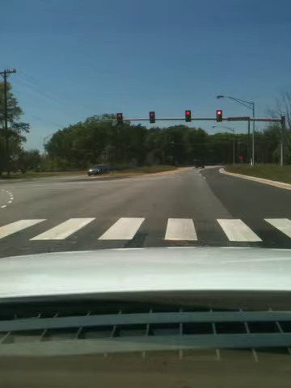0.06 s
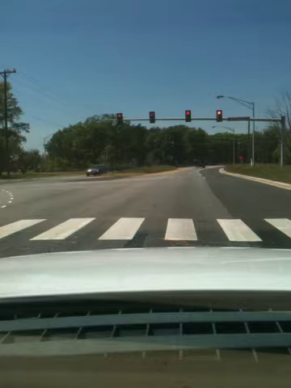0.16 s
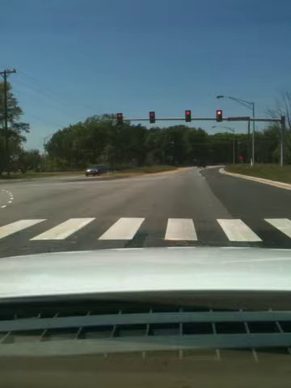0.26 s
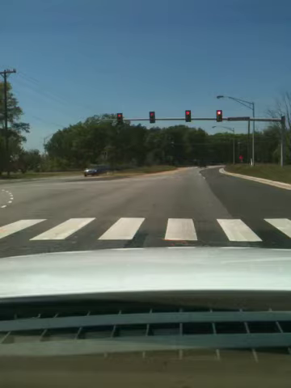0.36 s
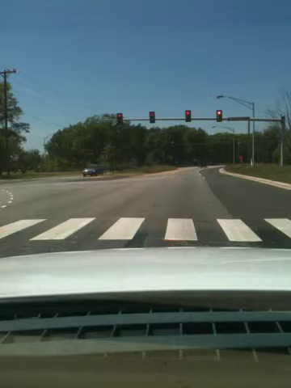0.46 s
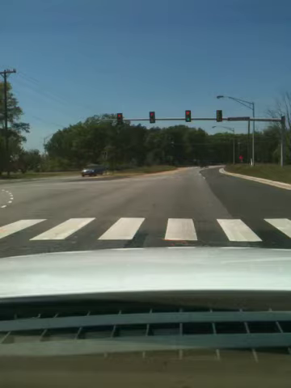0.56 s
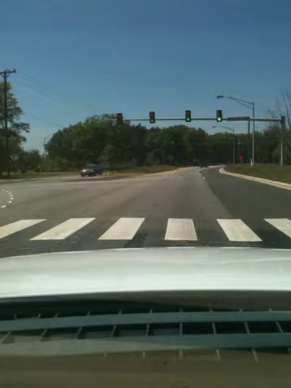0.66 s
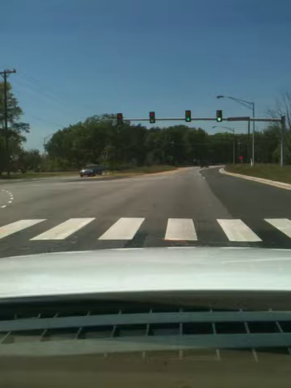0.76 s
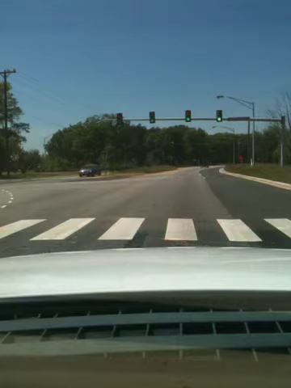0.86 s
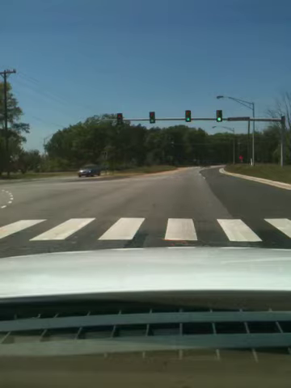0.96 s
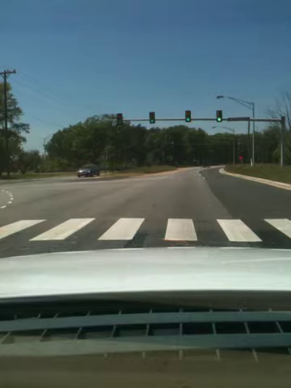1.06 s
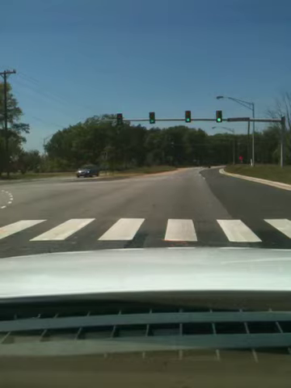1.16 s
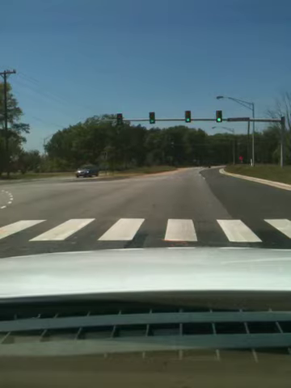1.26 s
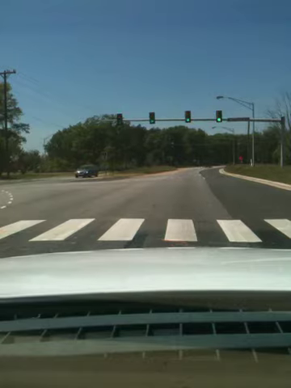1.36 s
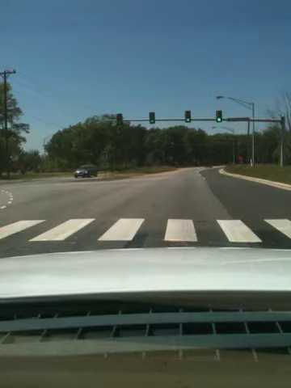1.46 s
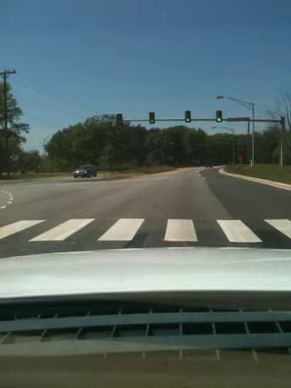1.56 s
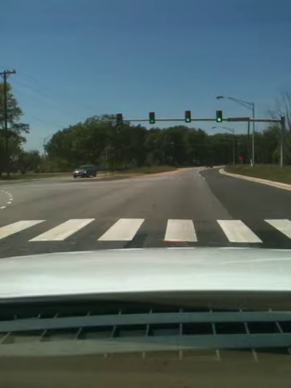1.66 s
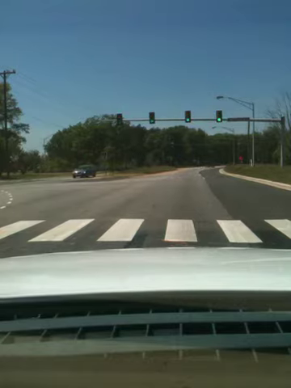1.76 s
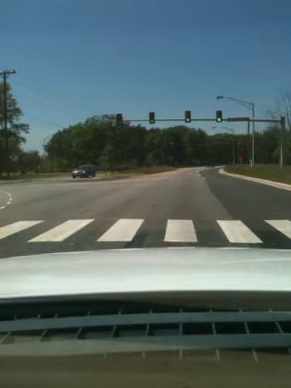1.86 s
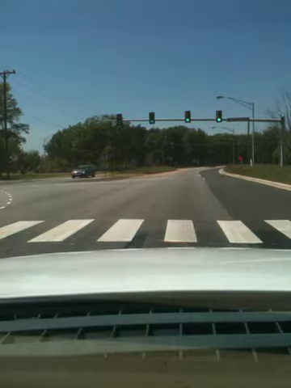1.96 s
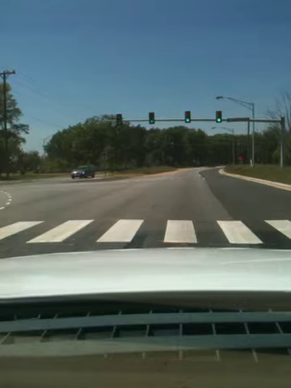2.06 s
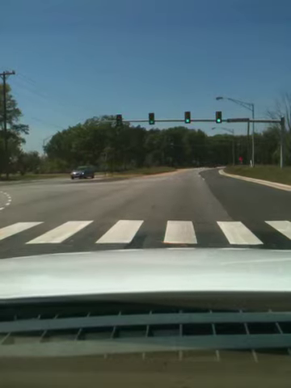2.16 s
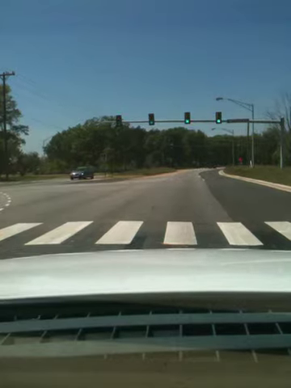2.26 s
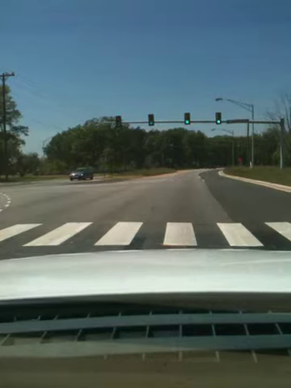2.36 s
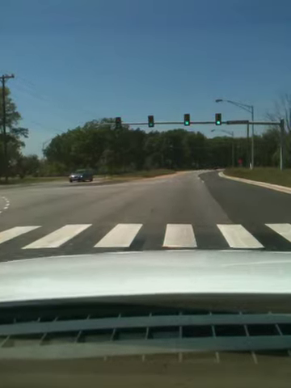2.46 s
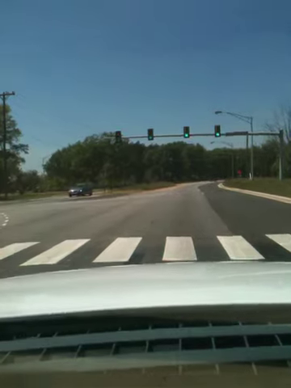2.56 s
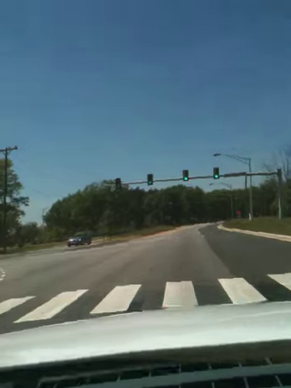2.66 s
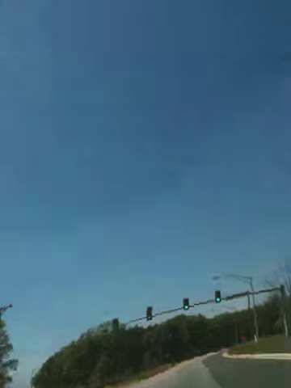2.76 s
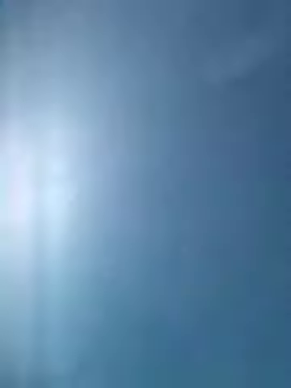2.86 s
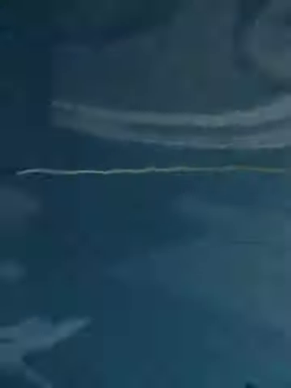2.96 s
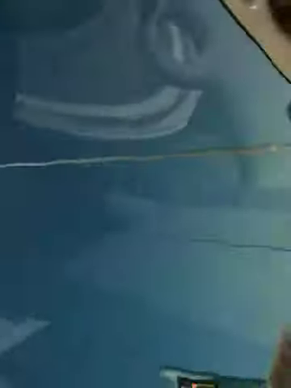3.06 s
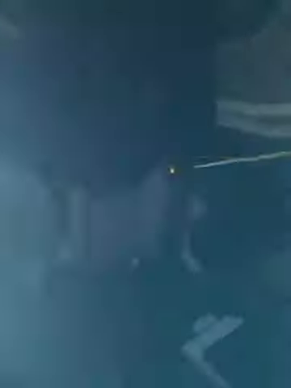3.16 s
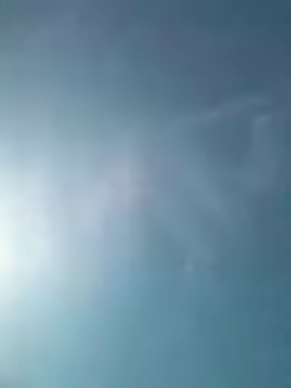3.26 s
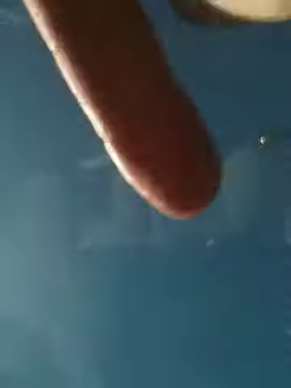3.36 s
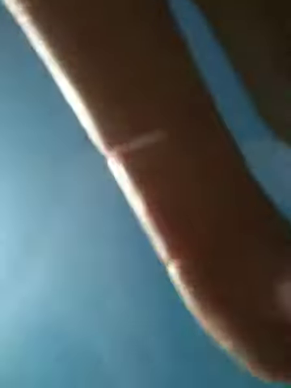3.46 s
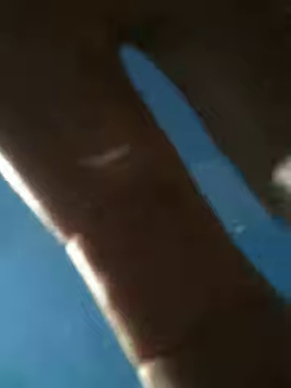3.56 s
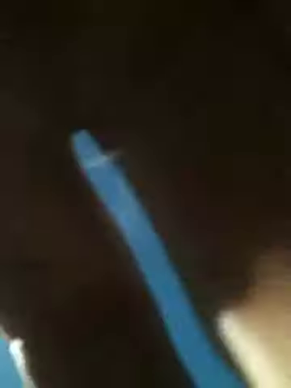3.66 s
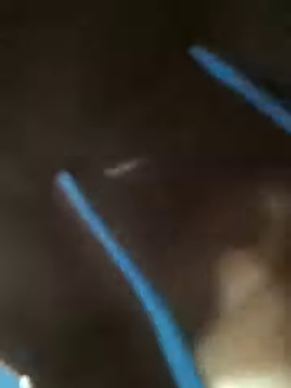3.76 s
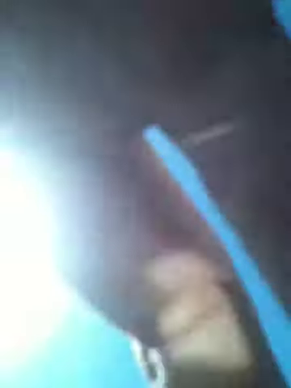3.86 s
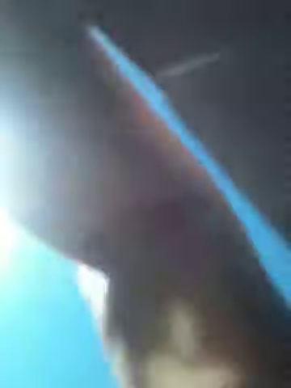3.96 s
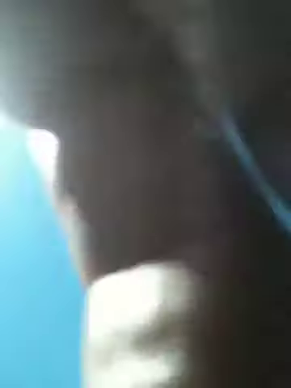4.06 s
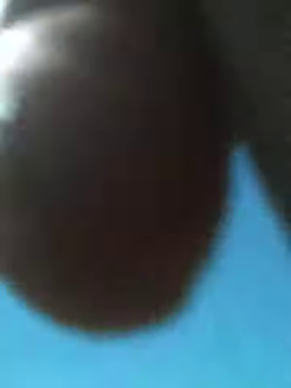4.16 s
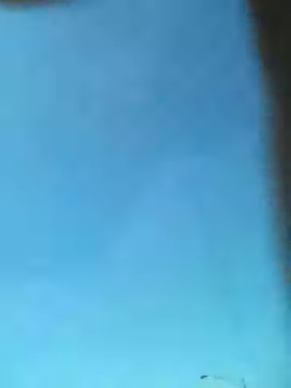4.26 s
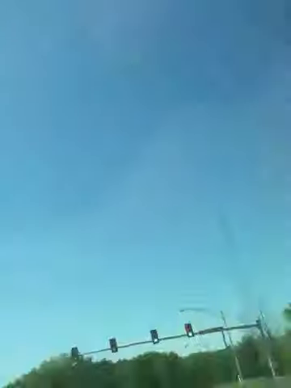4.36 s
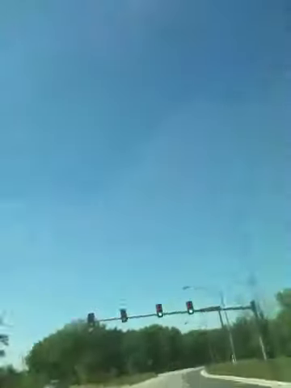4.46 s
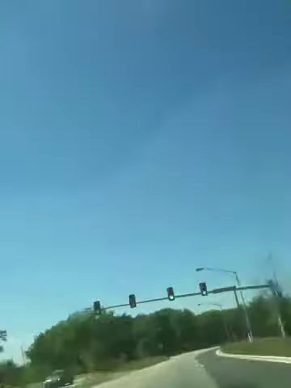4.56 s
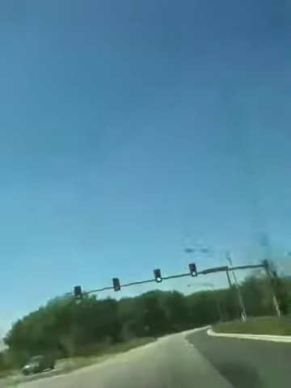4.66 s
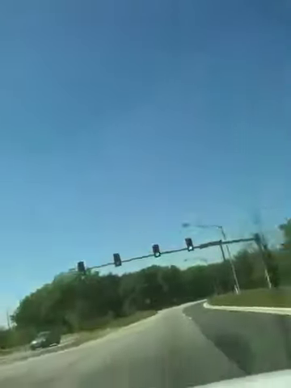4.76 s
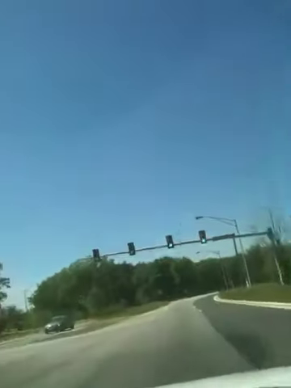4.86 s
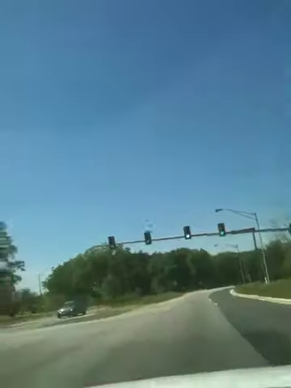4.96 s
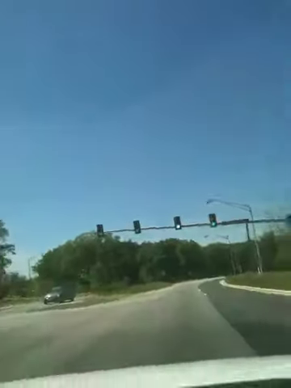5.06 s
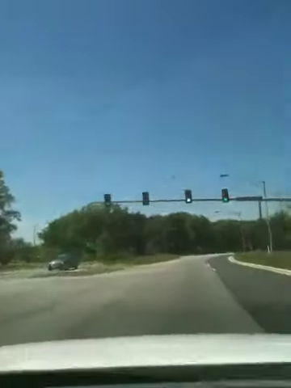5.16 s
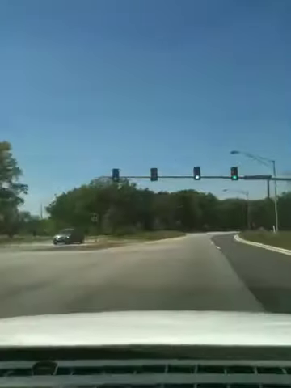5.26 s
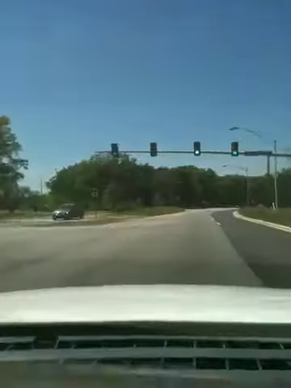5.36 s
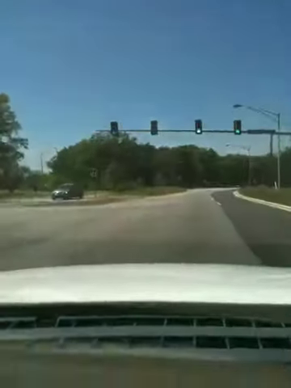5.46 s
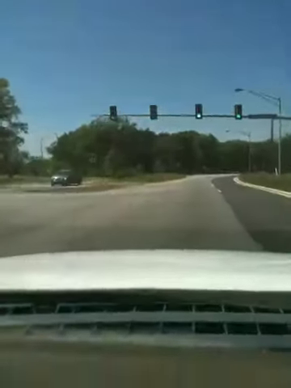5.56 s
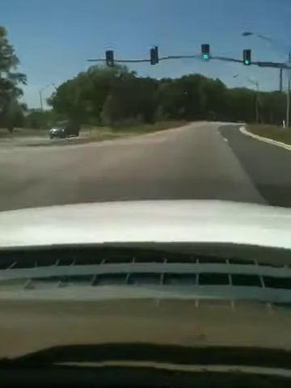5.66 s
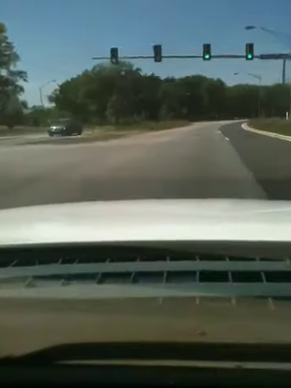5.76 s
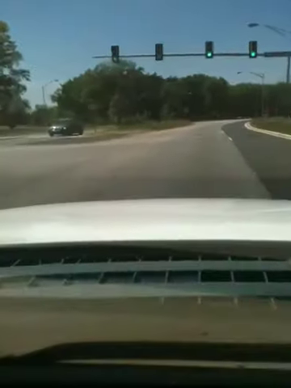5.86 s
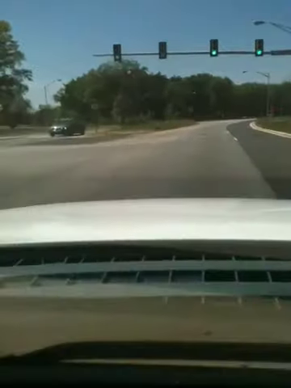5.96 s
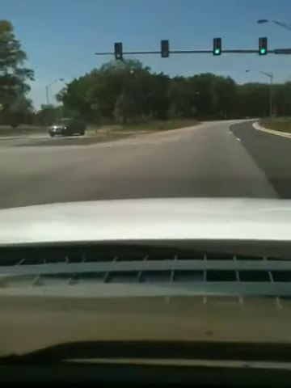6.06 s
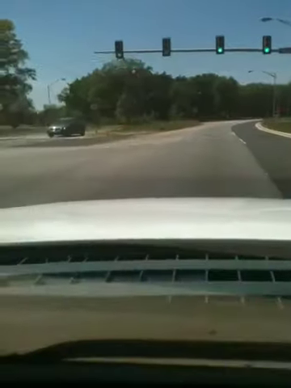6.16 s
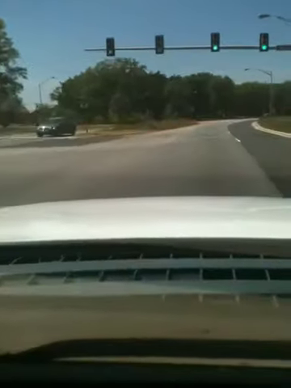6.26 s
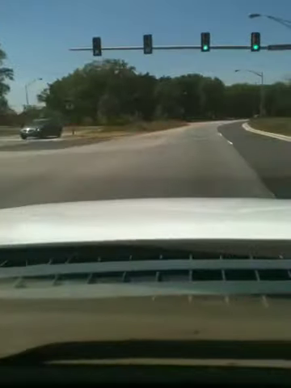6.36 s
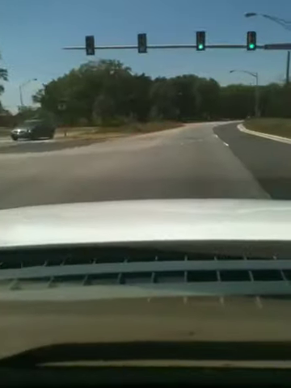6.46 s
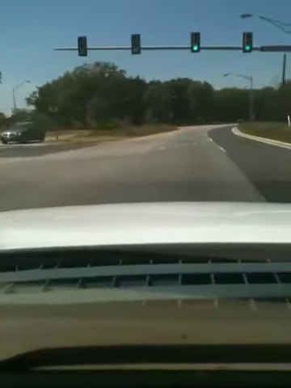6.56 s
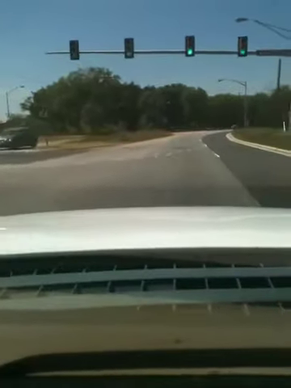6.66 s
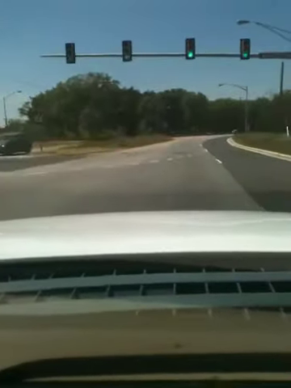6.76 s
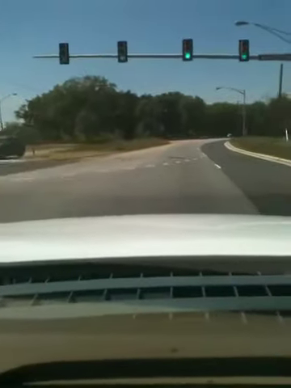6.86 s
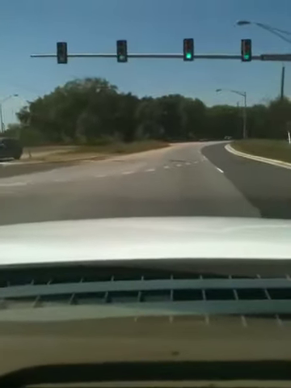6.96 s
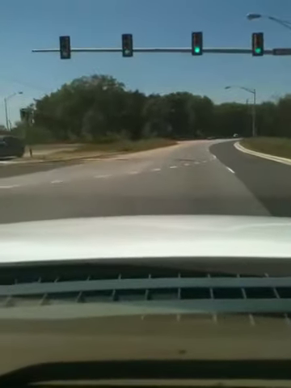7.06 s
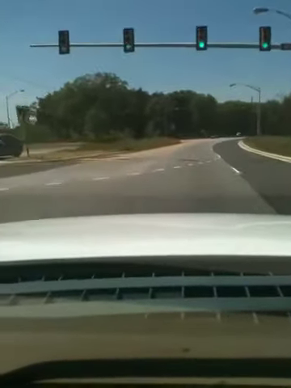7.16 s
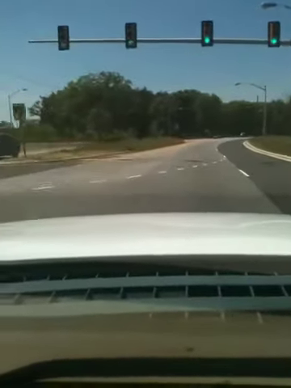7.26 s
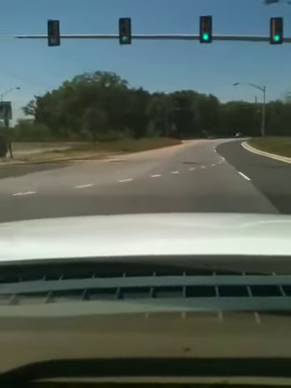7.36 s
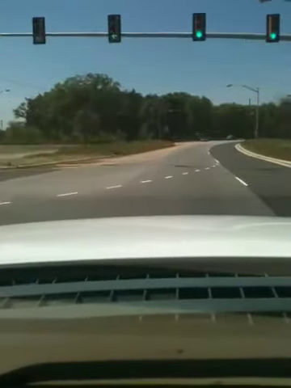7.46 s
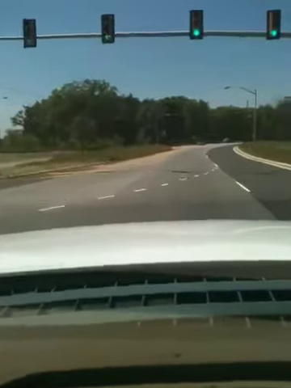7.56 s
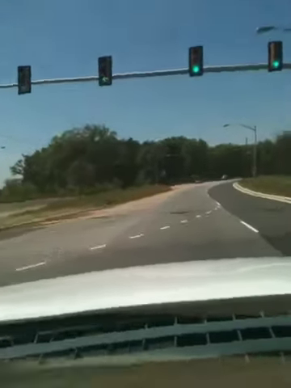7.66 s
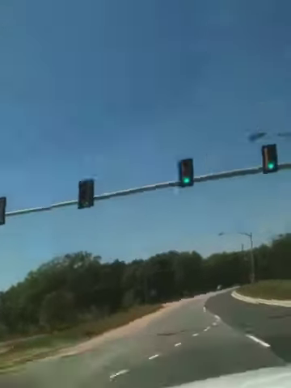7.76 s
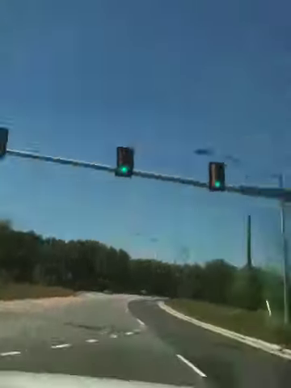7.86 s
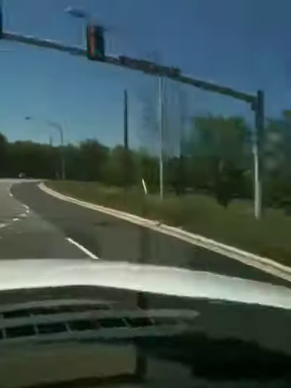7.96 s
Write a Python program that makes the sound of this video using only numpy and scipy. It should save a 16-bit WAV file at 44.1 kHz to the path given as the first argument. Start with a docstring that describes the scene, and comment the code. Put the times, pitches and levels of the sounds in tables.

```python
"""Eight-cylinder car cabin with a tumbling camera

The engine idles, pulls away, revs up and changes gear: tones at multiples of its cycle rate boom as they cross
cabin resonances, over puffing intake noise. Rumble and tyre roar are coloured noise that grows with speed.
The brake pedal bumps and creaks. A camera slides off the dashboard and tumbles: noise bursts and ringing modes
make its knocks, short cycles its ticks, and grainy noise its scrapes, rubbing fingers and shivers in its seat."""
import sys
import numpy as np
from scipy import signal
from scipy.fft import rfft, irfft, next_fast_len
from scipy.io import wavfile
from scipy.ndimage import uniform_filter1d, map_coordinates

SR = 44100
rng = np.random.default_rng(int(sys.argv[2]) if len(sys.argv) > 2 else 0)


def materialize(psi):
    """Save the field psi as 16-bit PCM at rate SR to the path in sys.argv[1].

    A 1-D psi becomes a single channel; in a 2-D psi each row is a channel.
    """
    bounded = np.clip(np.atleast_2d(psi).T, -1, 1)
    quanta = np.round(bounded * 32767).astype(np.int16)
    wavfile.write(sys.argv[1], SR, quanta)


N = 353682


def amp(db):
    """Decibels to gain."""
    return 10 ** (np.asarray(db) / 20)


def unit(x):
    """Scale to rms 1."""
    return x / np.sqrt(np.mean(x ** 2) + 1e-20)


def along(points, hz):
    """Read (frequency, value) points on a log frequency axis."""
    f, v = np.transpose(points)
    return np.interp(np.log(hz + 1), np.log(f + 1), v)


def curves(rows):
    """One value per sample for each column after the time."""
    s, *cols = np.transpose(rows)
    return [np.interp(np.arange(N) / SR, s, c) for c in cols]


def wobble(rate):
    """A smooth random curve with rate knots a second."""
    grid = np.arange(0, N + SR / rate, SR / rate / 5)
    knots = rng.standard_normal(int(N * rate / SR) + 4)
    smooth = map_coordinates(knots, [grid * rate / SR], mode="nearest")
    return np.interp(np.arange(N), grid, smooth)


def filtered(x, response):
    """Shape the spectrum of x by a response of frequency."""
    m = next_fast_len(len(x) + 8192)
    return irfft(rfft(x, m) * response(np.fft.rfftfreq(m, 1 / SR)), m)[:len(x)]


def noise(spectrum, size=N):
    """Coloured noise of rms 1."""
    return unit(filtered(rng.standard_normal(size), lambda hz: amp(along(spectrum, hz))))


def add(track, s, sound):
    """Mix a sound into the track at time s."""
    part = track[max(round(s * SR), 0):][:len(sound)]
    part += sound[:len(part)]


def strokes(rows):
    """Smooth swells from rows of (middle [s], length [s], level at the middle [dB])."""
    out = np.zeros(N)
    for s, length, db in rows:
        add(out, s - length / 2, amp(db) * np.hanning(round(length * SR)))
    return out


def ring(modes, t, scatter_db, detune):
    """Damped modes of peak 1; each contact draws new strengths and slightly new pitches."""
    y = 0
    for hz, db, t60 in modes:
        decay = amp(db + scatter_db * rng.normal() - 60 * t / t60)
        y = y + decay * np.sin(2 * np.pi * hz * (1 + detune * rng.normal()) * t)
    return y / np.abs(y).max()


def spot_colour(spectrum):
    """Every struck spot adds peaks and dips of its own to a shared spectrum."""
    hz = np.geomspace(80, 16000, 48)
    spot_db = 2.5 * rng.standard_normal(len(hz))
    return np.column_stack([hz, along(spectrum, hz) + spot_db])


PULL_AWAY_S, RUN_UP_S = 1.9, 4.93  # the car rolls off; time from there to full speed


def speed():
    """Road speed as a share of full speed: steady acceleration from rest."""
    return np.clip((np.arange(N) / SR - PULL_AWAY_S) / RUN_UP_S, 0, 1)


# engine speed: (time [s], firing rate [Hz])
FIRING_RATE = [(0, 42.6), (1.7, 42.2), (2.3, 60.5), (2.55, 64.5), (2.9, 77), (3.15, 83), (3.5, 91.5),
               (3.8, 97.5), (4.05, 103.7), (4.65, 129.2), (5.25, 139), (5.7, 151), (5.85, 159), (6.45, 176),
               (7.2, 195.4), (7.35, 193.1), (7.65, 161.5), (8.02, 159.5)]
# throttle opening, eased for the gear change; also drives the road noise: (time [s], engine load [dB])
ENGINE_LOAD = [(0, -12.5), (1.9, -6.5), (2.5, -0.5), (4.3, -3), (5.8, -0.5), (7.3, 1.5), (7.55, -3),
               (8.02, -0.5)]
# hum at five times the firing rate, strongest soon after rolling off: (time [s], level before waver [dB])
HUM_LEVEL = [(0, -60.5), (1.8, -58.5), (2.35, -61), (2.48, -46), (2.58, -49), (2.7, -65), (3.2, -85)]
# colour of intake and valve noise: (frequency [Hz], relative level [dB per Hz])
INTAKE_COLOUR = [(600, -1.5), (1050, 1), (1250, 2), (1500, -1), (1800, -26), (2050, -2), (2300, -48),
                 (2800, -17.5), (3350, -8), (4200, -27.5), (9000, -44)]
ENGINE_DB, INTAKE_DB = -44.5, -44.5  # at 0 dB load and top revs
ENGINE_DB_PER_OCTAVE = 11  # growth of the tones with the revs


def engine():
    """Eight firings a cycle drive exhaust tones and intake puffs; both grow with throttle and revs."""
    firing_hz, = curves(FIRING_RATE)
    load_db, = curves(ENGINE_LOAD)
    hum_db, = curves(HUM_LEVEL)
    cylinders = 8
    cycle_hz = uniform_filter1d(firing_hz, size=4000) / cylinders
    phase = 2 * np.pi * np.cumsum(cycle_hz) / SR
    revs = firing_hz / firing_hz.max()
    tone_db = ENGINE_DB + load_db + ENGINE_DB_PER_OCTAVE * np.log2(revs)
    tones = exhaust_tones(phase, cycle_hz, tone_db)
    hum = amp(hum_db + 2 * wobble(6)) * np.sqrt(2) * np.sin(5 * cylinders * phase)
    # one puff a firing
    puffs = unit(noise(INTAKE_COLOUR) * amp(1.2 * np.sin(cylinders * phase))) * revs ** 3
    return tones + amp(load_db + INTAKE_DB) * puffs + hum


# multiples of the cycle rate that stand out or stay back:
# (multiple, relative level [dB], extra at standstill that fades out towards full speed [dB])
FAVOURED_MULTIPLES = [(5, 0, -16), (6, -11, 0), (7, -7, 0), (8, 9, 0), (10, -7, 0), (11, -8, 12),
                      (12, -7, 0), (16, 0, 6), (17, 1, 0), (18, 1, 0), (19, 0, 0), (22, 0, 7), (24, 5, 0),
                      (26, 1, 0), (27, 2, 0), (29, 3, 0), (32, 3, 0)]
PLAIN_MULTIPLE_DB = -2.5  # all other multiples
# the cabin's response to the engine: (frequency [Hz], gain [dB])
CABIN_RESPONSE = [(50, -34), (64, -16), (78, -7), (100, -7), (116, -1), (131, 9), (138, -1), (143, -5),
                  (149, -1), (157, -8), (163, 6), (168, 7), (177, 10), (192, 4), (197, 0), (212, 1),
                  (232, -2), (256, 5), (278, 2), (322, -1), (345, -8), (365, -3), (395, -10), (482, -2),
                  (505, -12), (610, -19), (670, -17), (700, -11), (730, -18), (900, -19), (1250, -15),
                  (1500, -26)]
# panels that sing when one multiple sweeps through them:
# (multiple, resonance [Hz], half width [Hz], rms level at the resonance [dB])
SINGING_PANELS = [(13, 259, 11, -41.5), (14, 257, 7, -45), (14, 281, 8, -46), (16, 272, 8, -46),
                  (16, 321, 6, -44), (18, 362, 6, -46), (16, 203, 8, -47), (16, 128, 5, -50),
                  (16, 186, 9, -46), (17, 136, 5, -48), (26, 206, 5, -51), (8, 79, 5, -58),
                  (8, 102, 4, -52), (20, 385, 14, -49), (19, 462, 6, -47), (17, 279, 9, -44),
                  (18, 304, 6, -49), (22, 170, 4, -49), (22, 529, 6, -50), (24, 313, 7, -46.5),
                  (24, 282, 9, -50), (24, 484, 7, -44), (28, 473, 5, -50), (29, 707, 9, -45),
                  (29, 686, 5, -49), (30, 688, 6, -48), (32, 655, 20, -52), (32, 772, 8, -52),
                  (37, 745, 14, -53), (38, 700, 10, -53), (38, 845, 10, -52), (21, 466, 6, -47)]
SHIFT_S, SHIFT_HALF_S, SHIFT_CUT_DB = 7.28, 0.18, -9  # gear change: middle, half length, dip of the firing tone


def exhaust_tones(phase, cycle_hz, level_db):
    """Unequal cylinders sound many multiples of the cycle rate; each swells as it crosses a cabin resonance."""
    step, firing = 8, 8  # all tones lie below 2 kHz, so a coarse time grid will do
    phase, cycle_hz, level_db = phase[::step], cycle_hz[::step], level_db[::step]
    pulling = 1 - speed()[::step]
    favoured = {round(k): db + extra_db * pulling for k, db, extra_db in FAVOURED_MULTIPLES}
    from_shift = (np.arange(0, N, step) / SR - SHIFT_S) / SHIFT_HALF_S
    shift_db = SHIFT_CUT_DB * np.exp(-np.abs(from_shift) ** 6)
    out = 0
    for k in range(5, 64):
        if k == firing:
            waver_db = shift_db + 1.1 * wobble(16)[::step]
        else:
            waver_db = 2.6 * wobble(5)[::step]
        tone_hz = k * cycle_hz
        db = level_db + favoured.get(k, PLAIN_MULTIPLE_DB) + along(CABIN_RESPONSE, tone_hz) + waver_db
        power = amp(db) ** 2
        for multiple, hz, width, peak_db in SINGING_PANELS:
            if multiple == k:
                power = power + amp(peak_db) ** 2 / (1 + ((tone_hz - hz) / width) ** 2) ** 2
        # high multiples drift more in phase
        drift = 2 * np.pi * rng.random() + k / 110 * wobble(9)[::step]
        out = out + np.sqrt(power) * np.sin(k * phase + drift)
    return np.sqrt(2) * signal.resample_poly(out, step, 1)[:N]


# colours of body rumble, tyre roar and air hiss: (frequency [Hz], relative level [dB per Hz])
RUMBLE_COLOUR = [(20, -10), (45, -8), (75, -11), (105, -13), (130, 6.5), (165, -2), (210, 7.5), (280, -0.5),
                 (350, 3), (480, -13), (650, -14.5), (1000, -18), (2500, -41)]
TYRE_COLOUR = [(260, -19), (450, 0.5), (473, 3), (508, -0.5), (585, -5), (694, -3), (760, -7.5),
               (1070, -16.5), (1230, -21), (1860, -20.5), (2040, -21), (2210, -20.5), (3340, -25.5),
               (5000, -33.5), (6500, -34), (11000, -120)]
AIR_COLOUR = [(1470, 20), (2500, -3), (3060, 12), (3330, -8), (4140, -11), (6110, -21), (13400, -12),
              (15200, -51.5), (16000, -22)]
RUMBLE_IDLE_DB, ROAR_IDLE_DB = -48.5, -58  # standing
RUMBLE_MOVING_DB, ROAR_MOVING_DB = -42, -43  # added at full speed and 0 dB load
RUMBLE_POWER, ROAR_POWER = 0.62, 0.72  # growth with speed
ROAD_LOAD_SHARE = 0.29  # dB per dB of engine load


def road():
    """Body rumble and tyre roar rise out of the idling cabin's noise with speed and load; air hisses faintly."""
    load_db, = curves(ENGINE_LOAD)
    drive = amp(ROAD_LOAD_SHARE * load_db)
    shake = np.hypot(amp(RUMBLE_IDLE_DB), amp(RUMBLE_MOVING_DB) * drive * speed() ** RUMBLE_POWER)
    roar = np.hypot(amp(ROAR_IDLE_DB), amp(ROAR_MOVING_DB) * drive * speed() ** ROAR_POWER)
    rumble = shake * amp(1.2 * wobble(11)) * noise(RUMBLE_COLOUR)
    tyres = roar * amp(0.34 * wobble(8.5)) * noise(TYRE_COLOUR)
    return rumble + tyres + amp(-70.0) * noise(AIR_COLOUR)


# fingers and dashboard rub the sliding case: (middle [s], length [s], level at the middle [dB])
RUB_STROKES = [(2.913, 0.45, -54.5), (3.163, 0.17, -56), (3.74, 0.04, -54), (3.792, 0.25, -47),
               (3.965, 0.078, -44), (4.126, 0.11, -49), (4.496, 0.38, -54), (6.896, 0.98, -48),
               (7.39, 0.12, -51), (7.8, 0.75, -54)]
# colour of skin on plastic: (frequency [Hz], relative level [dB per Hz])
SKIN_COLOUR = [(800, 5.5), (1300, 4.5), (2500, -2.5), (3500, -1.5), (5000, -0.5), (7800, 1), (10500, -3.5),
               (13000, -8), (16000, -18)]
CREEP_STILL_DB, CREEP_MOVING_DB = -74.5, -55.5  # case creeping in its seat: standing, added at full speed
GRAIN_DB, FLUTTER_DB, CRACKLE_DB = 2, 1.5, -20  # fast grain, slower unevenness, stray catches against the rub


def rubbing():
    """Skin and plastic catch and slip in tiny grains, swelling with each stroke; stray crackles once moving."""
    pressure = strokes(RUB_STROKES)
    creep = amp(CREEP_STILL_DB) + amp(CREEP_MOVING_DB) * speed() ** 2.0
    grain = amp(GRAIN_DB * wobble(400) + FLUTTER_DB * wobble(45))
    catches = (rng.random(N) < 25 / SR) * rng.uniform(-1, 1, N)  # about 25 a second
    crackle = unit(filtered(catches, lambda hz: amp(along(SKIN_COLOUR, hz))))
    rub = unit(noise(SKIN_COLOUR) * grain)
    return np.hypot(pressure, creep) * (rub + amp(CRACKLE_DB) * crackle * (speed() > 0))


# bumps and creaks as the brake lets go:
# (time [s], relative bump level [dB], creak peak [dB], creak pitch at the start [Hz])
PEDAL_MOVES = [(0.92, -37, -47, 665), (0.962, -30, -45, 1035), (1.012, -43, -52, 1070),
               (1.047, -35, -37, 920), (1.054, -37, -43, 835), (1.067, -35.5, -50, 790),
               (1.11, -44, -51, 1020)]
# modes of the pedal linkage: (frequency [Hz], relative level [dB], t60 [s])
LINKAGE_MODES = [(180, 5, 0.16), (377, 8, 0.046), (485, -4, 0.18), (850, 4, 0.019), (986, -13, 0.12)]
CREAK_S, CREAK_SAG = 0.0035, 0.027  # time to swell; share by which the pitch ends up lower


def pedal():
    """The released brake bumps softly under the dashboard, creaks and sighs."""
    out, t = np.zeros(N), np.arange(SR // 3) / SR
    sigh_colour = [(1500, 6.0), (3500, -3), (4150, 5), (4700, -2), (10000, -4.0), (15000, -21)]
    for s, bump_db, creak_db, hz in PEDAL_MOVES:
        age = t / CREAK_S
        sag = 1 - CREAK_SAG * np.tanh(age / 2)
        creak = np.sin(2 * np.pi * hz * t * sag) * age ** 2 * np.exp(2 - 2 * age)
        bump = ring(LINKAGE_MODES, t, scatter_db=2, detune=.02) * (1 - np.exp(-t / .002))
        sigh = amp(-62.5 - 60 * t / 0.35) * noise(sigh_colour, size=len(t))
        add(out, s, amp(bump_db + 7.5) * bump + amp(creak_db) * creak + sigh)
    return out


# case and fingers scrape over plastic: (time [s], length [s], slip level [dB], ring level [dB],
# ring pitch at the start [Hz], ring pitch at the end [Hz], ring width [Hz])
PLASTIC_SCRAPES = [(1.17, 0.062, -47, -57, 2100, 1725, 600), (2.346, 0.018, -64, -60, 5630, 5640, 2500),
                   (2.951, 0.043, -24.5, -28.5, 3000, 1877, 900),
                   (3.032, 0.013, -23.5, -31.5, 4230, 4260, 900),
                   (3.055, 0.041, -35.5, -45, 2210, 2236, 700), (3.248, 0.052, -34, -34, 2270, 1717, 700),
                   (3.34, 0.015, -25, -30, 1590, 2480, 600), (3.562, 0.015, -37.5, -42, 1940, 1920, 450),
                   (3.563, 0.0089, -41, -43.5, 3790, 3790, 900), (3.609, 0.081, -47, -52, 1690, 1685, 550),
                   (3.765, 0.042, -39.5, -46, 1600, 1790, 900), (3.832, 0.058, -48.5, -53, 1900, 1900, 900),
                   (3.881, 0.049, -42, -42, 1663, 1694, 650), (5.7203, .016, -38.5, -47, 2300, 2300, 1200),
                   (6.096, 0.0059, -41, -49, 3000, 3000, 900), (6.659, 0.016, -36.5, -57, 4000, 3000, 900),
                   (7.362, 0.068, -56, -54, 4400, 4380, 1300), (7.43, .03, -66, -53, 3050, 3000, 120),
                   (7.898, 0.021, -38.5, -42, 1500, 3030, 700), (7.92, .009, -38, -35.5, 2640, 2650, 800),
                   (8.01, 0.011, -35, -43, 2700, 3330, 400)]
# colour of slips on plastic: (frequency [Hz], relative level [dB per Hz])
SLIP_COLOUR = [(50, -5), (160, 10), (400, 16.5), (1200, -1.5), (2800, 0), (3900, 0), (5000, -6),
               (7000, -5.5), (10000, -10.5), (16000, -22)]
SLIP_GRAIN_DB = 5.5  # how unevenly the plastic catches


def scrapes():
    """A dense run of tiny slips on grained plastic, its ring gliding with the spot that is touched."""
    out = np.zeros(N)
    grain, slips = amp(SLIP_GRAIN_DB * wobble(700)), noise(SLIP_COLOUR)
    for s, length, slip_db, ring_db, start_hz, end_hz, width_hz in PLASTIC_SCRAPES:
        n = round(length * SR)
        catch, run = (np.roll(v, -round(s * SR))[:n] for v in (grain, slips))
        glide = 2 * np.pi * np.cumsum(np.linspace(start_hz, end_hz, n)) / SR
        # two slow noises on a gliding carrier make a gliding noise band; the extra samples let the filter settle
        b, a = signal.butter(2, width_hz / SR)
        narrow = signal.lfilter(b, a, rng.standard_normal((2, n + 1000)))[:, -n:]
        spot = narrow[0] * np.cos(glide) + narrow[1] * np.sin(glide)
        scrape = amp(slip_db) * unit(run * catch) + amp(ring_db) * unit(spot * np.sqrt(catch))
        add(out, s, scrape * signal.windows.tukey(n, .3))
    return out


# hard contacts, levels before the mix trims; the first three are the brake pedal knocking as it lets go, the
# rest the tumbling camera: # (time [s], crack [dB], thump [dB], clack [dB], thump pitch [Hz])
KNOCK_CONTACTS = [(1.1767, -44, -33.5, -37, 280), (1.1911, -44, -24, -40, 154), (1.211, -46, -34, -47, 139),
                  (2.9385, -11, -8.5, -10, 283), (2.945, -6, -15.5, -11, 171), (2.9513, -2, -9, -1, 297),
                  (2.9608, -7, -13, -18, 143), (2.965, -5, -14.5, -16.5, 260), (2.97, -8, -18, -8.5, 226),
                  (2.978, -17, -34, -13.5, 280), (2.9933, -13, -13, -17, 237),
                  (3.0341, 0.5, -16.5, -20, 213), (3.0434, -8, -31, -24, 202),
                  (3.0612, -30, -21.5, -25, 243), (3.0742, -11, -20.5, -43, 201),
                  (3.0816, -12, -19.5, -27, 202.8), (3.0862, -9, -44, -26, 230),
                  (3.2433, 0, -8.5, -10.5, 288), (3.248, -4, -7, -6, 286), (3.255, -12, -27, -27, 260),
                  (3.26, -19, -25, -9, 250), (3.2743, -0.5, -6.5, -9.5, 318), (3.278, 4, -12, -19, 236),
                  (3.2825, -13, -6.5, -20, 223), (3.289, -6, -30, -26, 240), (3.3045, -23, -32, -43, 220),
                  (3.31, -31, -30, -44, 220), (3.3318, -1, -4, -4.5, 300), (3.336, -10, -20, -21, 280),
                  (3.343, -14, -32, -24, 305), (3.349, -12, -22, -19, 387), (3.37, -9, -17, -20, 248),
                  (3.396, -3.5, -28, -21, 238), (3.403, -14, -12.5, -24.5, 230),
                  (3.4225, -12.5, -45, -34, 200), (3.4266, -17.5, -45, -30, 200),
                  (7.8531, -11, -38, -34, 228), (7.8668, -20, -17, -20.5, 228),
                  (7.891, -40, -42, -26.5, 256), (8.013, -21, -24, -27, 258)]
# colours of the bright crack and the duller clack: (frequency [Hz], relative level [dB per Hz])
CRACK_COLOUR = [(200, -50), (1200, 9.5), (2500, 3), (4000, -1.5), (6500, 6.5), (10000, 5), (13000, -9.5),
                (16000, -19)]
CLACK_COLOUR = [(80, -54), (250, 10.5), (500, 5.5), (850, 0), (1300, -6), (1700, -10), (2300, -14),
                (3500, -15.5), (8000, -28.5)]
# modes of dashboard and case: (frequency [Hz], relative level [dB], t60 [s])
PANEL_MODES = [(132.7, -13.5, 1), (203.2, 9, 0.17), (261, 1, 0.31), (335, 9, 0.085), (392, 1, 0.14),
               (445, -9, 0.27)]
# modes of the plastic shell: (frequency [Hz], relative level [dB], t60 before extra damping [s])
SHELL_MODES = [(741, 6, 0.34), (1200, -3.5, 0.29), (1713, -20.5, 0.11), (2060, -1, 0.92), (2490, -3, 0.18),
               (2710, 7, 0.11), (2750, -35, 0.17), (3890, -9, 0.11)]
SHELL_DB, SHELL_DAMPING_S = -19, 0.13  # against the clack; extra damping (t60) by the surface it lies on
CRACK_S, CLACK_S = 0.0043, 0.0079  # t60 of the blow itself
CRACK_BUZZ_DB, CRACK_BUZZ_S = -15, 0.048  # loose parts after the blow: relative level, t60
CLACK_BUZZ_DB, CLACK_BUZZ_S = -14, 0.11
CHATTER_DB = 4.5  # how unevenly loose parts buzz
THUMP_CYCLES = 10  # a thump falls 60 dB in so many cycles, so low ones last longer


def knocks():
    """Each blow crackles on the case, clacks through loose trim, thumps at the spot and rings shell and panel."""
    out, t = np.zeros(N), np.arange(SR // 4) / SR
    chatter = unit(amp(CHATTER_DB * wobble(600)))
    contact = 1 - np.exp(-t / .0002)
    for s, crack_db, thump_db, clack_db, hz in KNOCK_CONTACTS:
        buzz = np.roll(chatter, -round(s * SR))[:len(t)]
        crack_decay = amp(-60 * t / CRACK_S) + buzz * amp(CRACK_BUZZ_DB - 60 * t / CRACK_BUZZ_S)
        crack = noise(spot_colour(CRACK_COLOUR), size=len(t)) * crack_decay
        clack_decay = amp(-60 * t / CLACK_S) + buzz * amp(CLACK_BUZZ_DB - 60 * t / CLACK_BUZZ_S)
        clack = noise(spot_colour(CLACK_COLOUR), size=len(t)) * clack_decay
        thump_shape = amp(-60 * t * hz / THUMP_CYCLES) * (1 - np.exp(-2.5 * hz * t))
        thump = np.sin(2 * np.pi * hz * t) * thump_shape
        panel = ring(PANEL_MODES, t, scatter_db=2.5, detune=.03)
        shell_decay = amp(SHELL_DB - 60 * t / SHELL_DAMPING_S)
        shell = ring(SHELL_MODES, t, scatter_db=4, detune=.004) * shell_decay
        bright = amp(crack_db - 12.5) * crack + amp(clack_db + 3.5) * (clack + shell)
        low = amp(thump_db + 7.5) * thump + amp(thump_db - 0.5) * panel
        add(out, s, contact * (bright + low))
    return out


# sharp ticks of the case: (time [s], snap peak [dB], pitch [Hz])
CASE_TICKS = [(2.539, -35.5, 7900), (2.629, -37.5, 7000), (2.696, -26, 9800), (2.711, -30.5, 6400),
              (2.895, -29.5, 4950), (2.9455, -10.5, 1980), (2.9532, 5.5, 4170), (2.9657, -6, 6500),
              (3.0365, -13, 4200), (3.04, -6.5, 4480), (3.0515, -19, 8000), (3.074, -13, 9300),
              (3.103, -30, 8000), (3.113, -35, 7000), (3.2437, -8.5, 4260), (3.261, -10.5, 2420),
              (3.2768, 0.5, 10000), (3.3324, -3, 2900), (3.3487, -13, 2360), (3.885, -26, 4000),
              (4.3158, -3, 4220), (4.3149, -14, 1250), (4.3153, -23, 610), (4.356, -38, 8000),
              (5.1221, -26, 7500), (5.2911, -28, 3770), (5.7222, -20.5, 7650), (6.097, -31.5, 4800),
              (6.652, -9.5, 8600), (6.662, -28, 6000), (6.816, -22.5, 8240), (6.841, -27, 5500),
              (7.411, -26, 4540), (7.733, -30, 9000), (7.853, -19, 2690), (7.891, -19.5, 1410)]


def ticks():
    """The case snaps right at the microphone: a cycle or two, then a faint rattle."""
    out, t = np.zeros(N), np.arange(SR // 20) / SR
    for s, db, hz in CASE_TICKS:
        age = t * hz / 0.33  # in thirds of a cycle
        snap = np.sin(2 * np.pi * hz * t) * age ** 2 * np.exp(-age)
        rattle = amp(min(db - 19.5, -42) - 60 * t / 0.04) * noise(CRACK_COLOUR, size=len(t))
        add(out, s, amp(db) * snap / np.abs(snap).max() + rattle)
    return out


# long swells and short bursts of shivering at speed: (middle [s], length [s], level at the middle [dB])
SEAT_JUDDERS = [(6.33, 0.53, -52), (6.52, 0.29, -51), (6.318, 0.022, -45.5), (6.355, .014, -47),
                (6.38, .014, -47), (6.467, .018, -44), (6.487, .016, -45), (6.52, .012, -51),
                (6.541, .016, -48), (6.561, .016, -44), (6.615, 0.013, -49), (6.72, .02, -47),
                (6.946, 0.016, -42), (7.003, .02, -43), (7.197, .02, -48), (7.3, 0.033, -51),
                (7.6, .012, -47)]
# colour of the case against its seat: (frequency [Hz], relative level [dB per Hz])
SEAT_COLOUR = [(2000, 5), (3500, -2), (4600, -1), (5500, 4), (6600, -4), (8100, 4.5), (8800, -4), (9500, 5),
               (10300, -4), (11400, 2.5), (12800, -8), (16000, -12)]
JUDDER_GRAIN_DB = 2  # roughness of the shiver


def judder():
    """Road bumps shake the case in its seat: a grainy, fluttering hiss in a few bright bands."""
    grain = amp(JUDDER_GRAIN_DB * wobble(500))
    return strokes(SEAT_JUDDERS) * unit(noise(SEAT_COLOUR) * grain)


def scene():
    """Everything heard in the cabin, in mono."""
    car = engine() + road() + pedal()
    camera = rubbing() + scrapes() + knocks() + ticks() + judder()
    return (car + camera)[None]


TOP_HZ = 15900  # band limit


def record(dry):
    """The small microphone drops deep bass, overloads on the hardest blows and cuts off steeply at the top."""
    thin = signal.sosfilt(signal.butter(4, 74, "highpass", fs=SR, output="sos"), dry[0])
    clipped = thin / (1 + np.abs(thin / .7) ** 6) ** (1 / 6)  # levels off at 0.7
    return filtered(clipped, lambda hz: 1 / (1 + (hz / TOP_HZ) ** 120))[None]


dry = scene()
out = record(dry)
materialize(out)
```